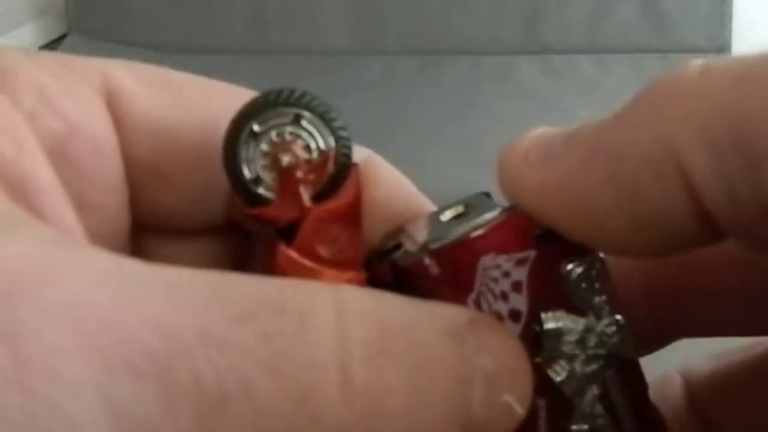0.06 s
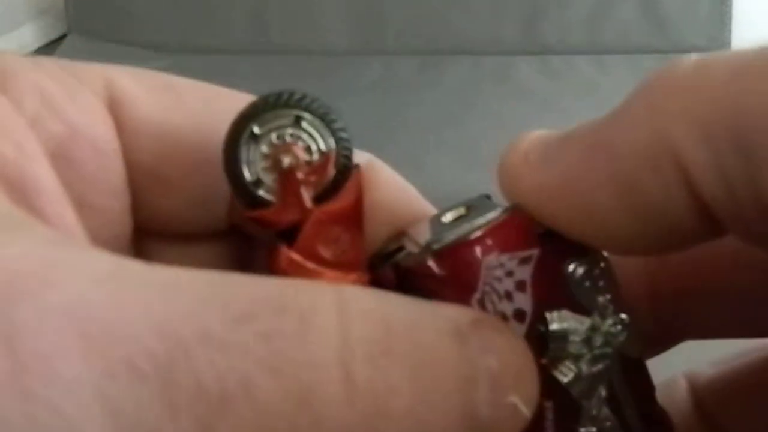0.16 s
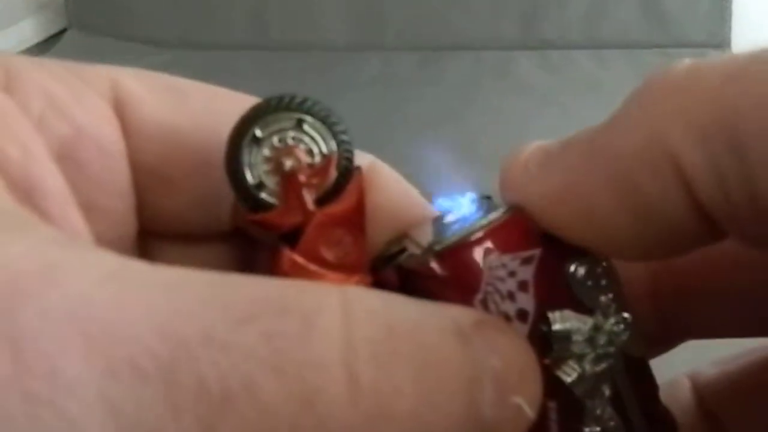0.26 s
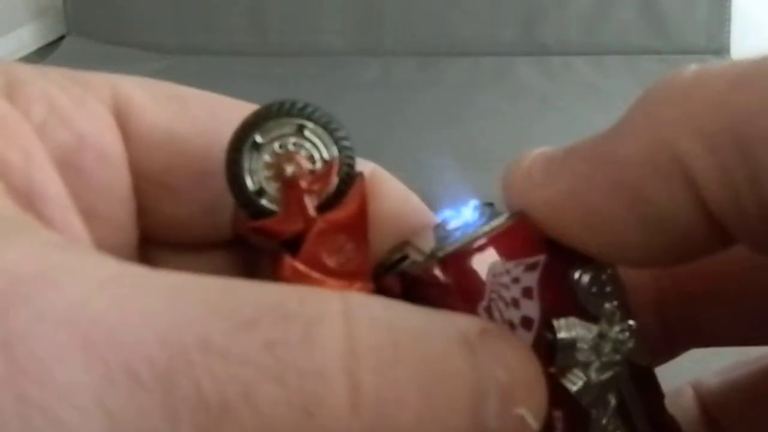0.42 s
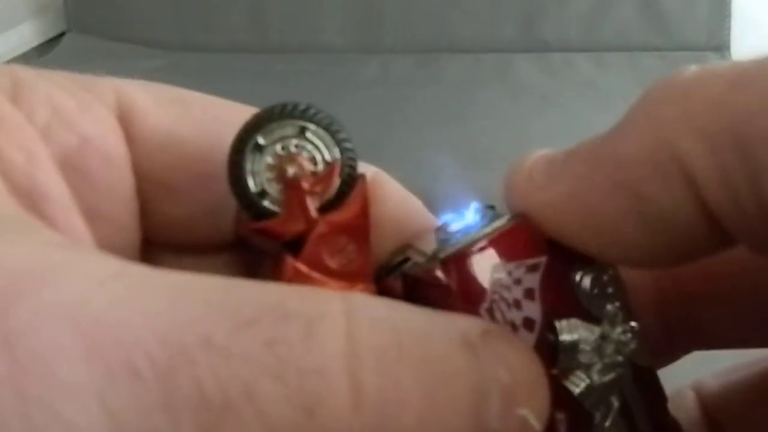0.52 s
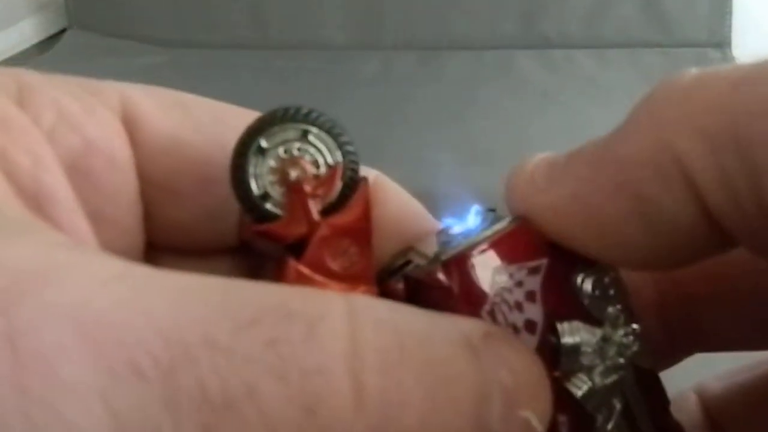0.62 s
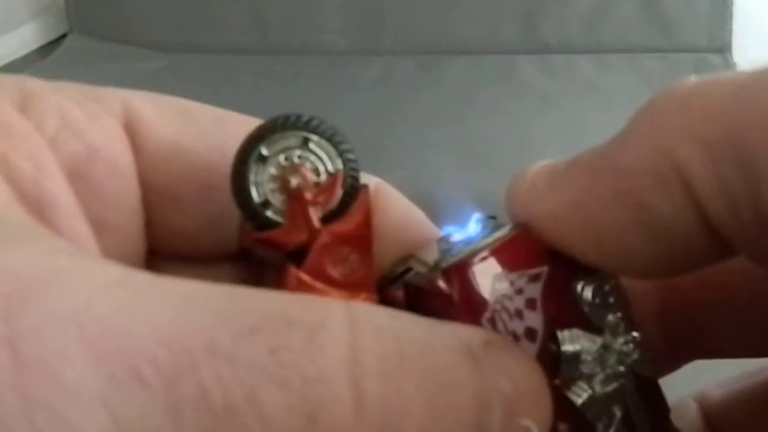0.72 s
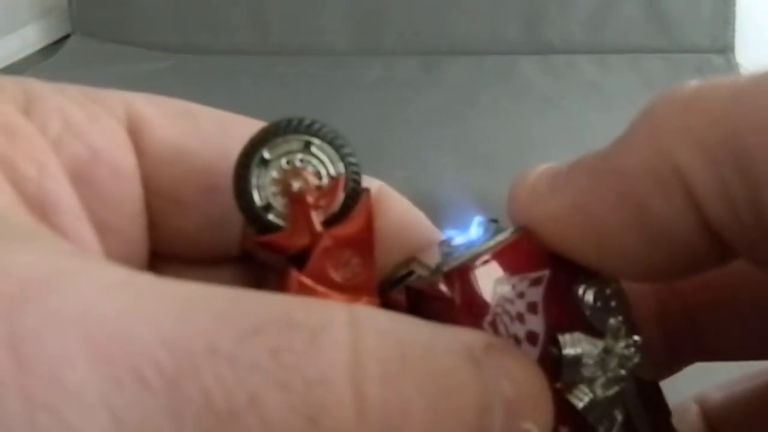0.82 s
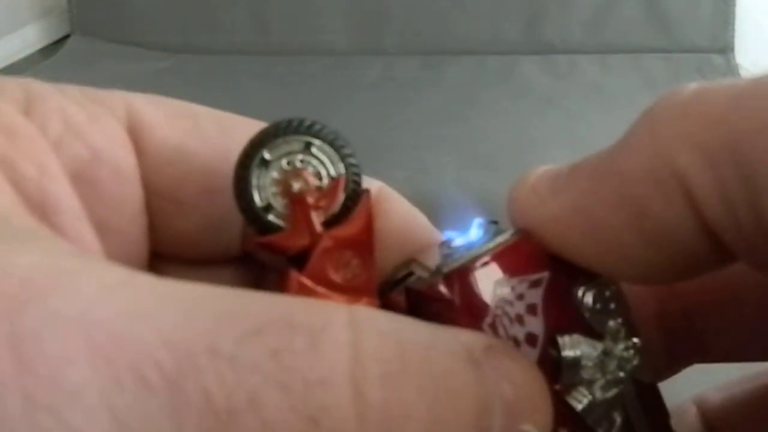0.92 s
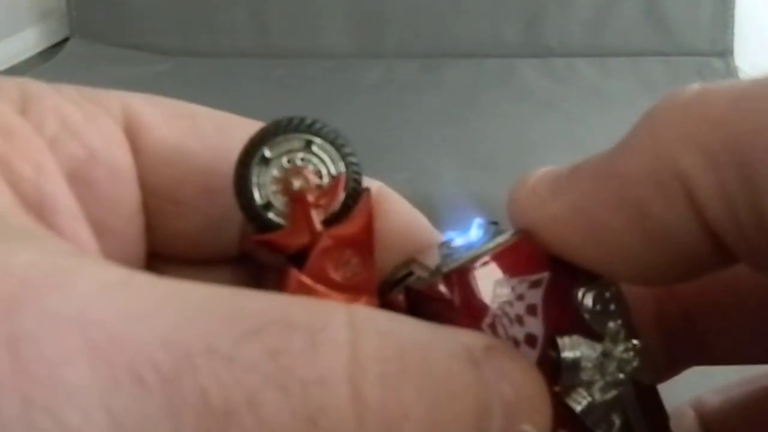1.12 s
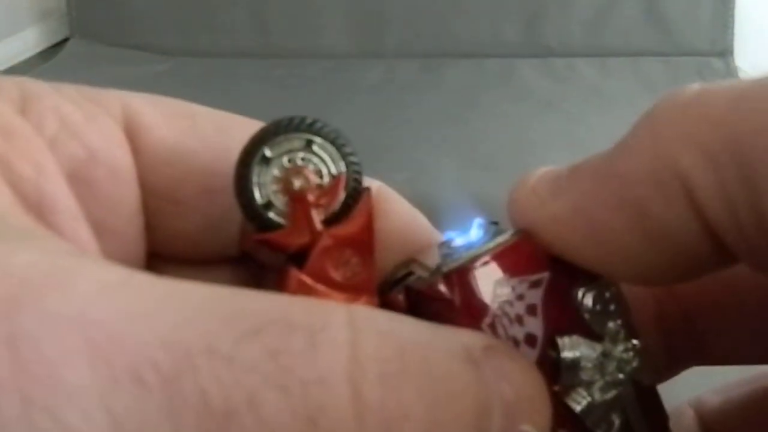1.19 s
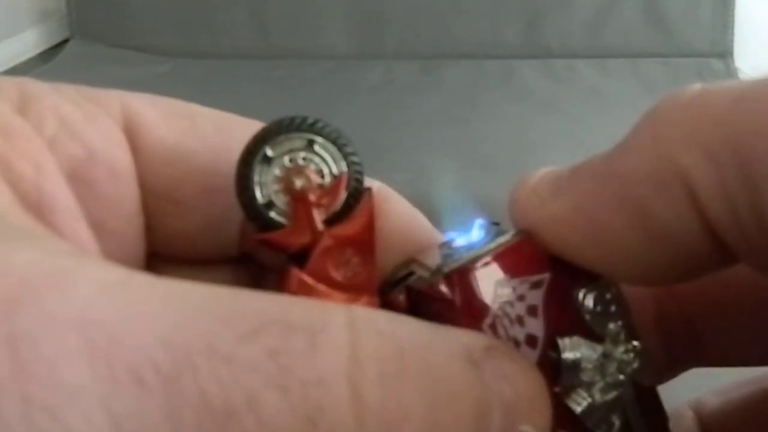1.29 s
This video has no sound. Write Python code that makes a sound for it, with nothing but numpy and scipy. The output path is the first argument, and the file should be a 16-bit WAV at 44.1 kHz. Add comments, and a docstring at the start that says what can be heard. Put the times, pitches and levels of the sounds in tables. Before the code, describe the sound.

A torch lighter hisses gas briefly, then ignites with one sharp metallic click. Its jet flame burns with a soft, steady roar, giving two tiny ticks and a short spit. Heard close up in a small, quiet room.

```python
"""Torch lighter in a quiet room

Gas hisses from the nozzle, close up, until the igniter's sprung hammer snaps and rings the body.
The jet flame burns with a soft roar, ticks twice as the nozzle warms and spits once as it settles.
The snap ducks an automatic gain control, which creeps back up over the next second."""
import sys
import numpy as np
from scipy import signal
from scipy.fft import rfft, irfft, next_fast_len
from scipy.io import wavfile

SR = 44100
rng = np.random.default_rng(int(sys.argv[2]) if len(sys.argv) > 2 else 0)


def wrap_up_sound(samples):
    """Save the sound to the file named by the first command line argument, as 16-bit audio."""
    columns = np.atleast_2d(samples).T
    # keep every value between -1 and 1, then stretch to whole-number steps
    tamed = np.clip(columns, -1, 1)
    steps = np.round(tamed * 32767).astype(np.int16)
    wavfile.write(sys.argv[1], SR, steps)


N = 59535

# Hiss of unlit gas. Each row: frequency in Hz, relative level in dB.
GAS_SPECTRUM = [(18, -47), (30, -19.5), (81, -2.5), (194, -3.5), (227, -1.5), (311, -2), (355, -10.5),
                (461, -9.5), (666, -13.5), (1460, -11), (2680, -20.5), (5040, -26.5), (6050, -25),
                (7470, -30), (8980, -22.5), (14000, -33.5), (16000, -43)]
# Brief, soft hiss around the snap. Each row: frequency in Hz, relative level in dB.
SWELL_SPECTRUM = [(200, 2), (1000, -0.5), (1900, -4), (3500, 0.5), (5500, -11.5), (8700, -2.5),
                  (11000, -5.5), (15500, -12.5)]
# The hammer's blow and rebound. Each row: start in seconds, level in dB.
HAMMER_BLOWS = [(.2503, 0.5), (0.2528, -18)]
# Ring of the lighter's body. Each row: pitch in Hz, relative level in dB, 60 dB decay in seconds.
BODY_MODES = [(1944, -9, .007), (2152, 2, 0.0073), (2407, -3, 0.0072), (2977, -2, 0.0082),
              (3546, -8.5, 0.0078), (3930, -16.5, 0.0051), (4600, -25, 0.014), (5410, -24.5, .007),
              (6940, -24.5, 0.01), (8330, -13.5, .006), (8927, -14.5, 0.0083), (10120, -24, 0.024),
              (11675, -21, 0.013), (13220, -16, 0.0052)]
# Bright edge of the crack and the ticks. Each row: frequency in Hz, relative level in dB.
CLICK_SPECTRUM = [(2000, -22), (5000, -4.5), (11000, 0.5), (16000, 0)]
# Thump of the jolt in the hand. Each row: pitch in Hz, level in dB, 60 dB decay in seconds.
THUMP_MODES = [(84.5, -34, .06), (130, -42, .35), (196.5, -31.5, 0.043), (258, -33, 0.032)]
# Spring rattle. Each row: frequency in Hz, relative level in dB.
RATTLE_SPECTRUM = [(300, -13.5), (1400, -15.5), (1900, 1), (3100, 2), (4200, -6), (5500, -10), (9000, -7),
                   (12000, -11.5), (15500, -16.5)]
# The flame's low roar. Each row: frequency in Hz, relative level in dB.
ROAR_SPECTRUM = [(25, -44), (60, -6.5), (130, -5.5), (200, -2), (275, -3), (360, -9.5), (490, -5),
                 (700, -15), (950, -14), (1650, -14.5), (2300, -21), (3650, -25), (4300, -36), (8000, -49),
                 (16000, -78)]
# The fizz on top of it. Each row: frequency in Hz, relative level in dB.
FIZZ_SPECTRUM = [(1500, -22), (4000, -0.5), (6000, 1), (7500, -3), (10000, -2), (15500, -8.5)]
# The flame's balance as it settles. Each row: time in seconds, roar level in dB, fizz level in dB.
FLAME_LEVELS = [(.26, -40.5, -71), (.45, -42.5, -71), (.6, -43.5, -66.5), (.8, -44, -65.5),
                (1.0, -43.5, -60), (1.12, -42.5, -58), (1.22, -43, -59), (1.35, -40, -57)]
# Ticks of the warming nozzle. Each row: start in seconds, level in dB.
NOZZLE_TICKS = [(0.9695, -32), (1.134, -44)]
# The spit's spurt of gas. Each row: frequency in Hz, relative level in dB.
SPIT_SPECTRUM = [(300, -18), (1000, 3), (2000, -6), (3000, -14), (4000, -3), (5000, -13), (9500, -9),
                 (15500, -21)]
# The spit's ring. Each row: centre in Hz, half-width in Hz, relative level in dB.
SPIT_RESONANCES = [(2334, 90, -1), (4000, 110, -6), (5880, 370, -1), (8500, 340, -18)]
# Length of the room's tail. Each row: frequency in Hz, 60 dB decay in seconds.
ROOM_DECAY = [(200, 0.19), (2500, 0.29), (9000, .2), (15000, .12)]
# Colour of that tail. Each row: frequency in Hz, relative level in dB.
ROOM_SPECTRUM = [(200, -2), (1500, -1.5), (2100, -6), (3000, -0.5), (6000, -3), (9000, 0), (15000, -4)]
# Stereo image of the noise, wider in the treble. Each row: frequency in Hz, left-right correlation.
STEREO_LIKENESS = [(60, 0.767), (200, 0.94), (500, .85), (1500, .88), (4000, 0.48), (12000, 0.32)]

IGNITE_S, CATCH_S = 0.2505, 0.043  # the snap, and the time constant of the gas-to-flame crossfade
TIME = np.arange(N) / SR


def amp(db):
    """Decibels to gain."""
    return 10 ** (np.asarray(db) / 20)


def along(points, hz):
    """Read a curve of (Hz, value) points on a log frequency axis."""
    freqs, values = np.transpose(points)
    return np.interp(np.log(hz + 1), np.log(freqs + 1), values)


def since(start_s):
    """Seconds elapsed after the start, zero before."""
    return np.maximum(TIME - start_s, 0)


def filtered(x, response):
    """Shape x with a gain that depends on frequency."""
    size = next_fast_len(N + SR // 2)
    hz = np.fft.rfftfreq(size, 1 / SR)
    return irfft(rfft(x, size) * response(hz), size)[..., :N]


def noise(response):
    """Coloured stereo noise of rms 1, narrow in the lows and wider on top."""
    def mid_side_gains(hz):
        angle = np.arccos(along(STEREO_LIKENESS, hz)) / 2
        return response(hz) * np.array([np.cos(angle), np.sin(angle)])

    mid, side = filtered(rng.standard_normal((2, N)), mid_side_gains)
    stereo = np.array([mid + side, mid - side])
    return stereo / np.sqrt(np.mean(stereo ** 2) + 1e-20)


def rush(spectrum):
    """Noise with a broad spectrum."""
    return noise(lambda hz: amp(along(spectrum, hz)))


def resonant(peaks):
    """Turbulence in resonances, each given as centre in Hz, half-width in Hz, relative dB."""
    return noise(lambda hz: sum(amp(db) / (1 + ((hz - mid) / width) ** 2) for mid, width, db in peaks))


def burst(spectrum, start_s, db, t60):
    """Noise that starts at once and falls 60 dB in t60 seconds."""
    t = since(start_s)
    return (t > 0) * amp(db - 60 * t / t60) * rush(spectrum)


def ringing(t, hz, db, t60, attack_s):
    """One damped mode, t seconds after a blow."""
    return amp(db - 60 * t / t60) * np.sin(2 * np.pi * hz * t) * (1 - np.exp(-t / attack_s))


def gas():
    """Unlit gas hisses and whistles until it catches. A brief, soft hiss swells and fades around the snap."""
    hiss = amp(-41.5) * rush(GAS_SPECTRUM)
    whistle = amp(-56.5) * resonant([(8850, 450, 0)])
    swell_db = -31.5 - 12 * ((TIME - IGNITE_S) / 0.024) ** 2  # 12 dB down 24 ms to either side
    swell = amp(swell_db) * rush(SWELL_SPECTRUM)
    return (hiss + whistle) * np.exp(-since(IGNITE_S) / CATCH_S) + swell


def igniter():
    """The sprung hammer cracks, rings the body (too small to radiate bass) and jolts the hand."""
    snap = np.zeros((2, N))
    bass_cut = signal.butter(6, 1680, "high", fs=SR, output="sos")
    for start_s, blow_db in HAMMER_BLOWS:
        t = since(start_s)
        ring = sum(ringing(t, hz, db, t60, attack_s=0.97 / hz) for hz, db, t60 in BODY_MODES)
        crack = burst(CLICK_SPECTRUM, start_s, db=-20, t60=0.006)
        snap += amp(blow_db) * (signal.sosfilt(bass_cut, ring) + crack)
    thump = sum(ringing(since(IGNITE_S), *mode, attack_s=0.0018) for mode in THUMP_MODES)
    return snap + thump


def spring_rattle():
    """The released spring shivers densely and dies away."""
    return burst(RATTLE_SPECTRUM, IGNITE_S, db=-28.5, t60=0.17)


def flame():
    """The lit jet roars with a hollow low resonance; its fizz grows as it settles."""
    times, roar_db, fizz_db = np.transpose(FLAME_LEVELS)
    broad = rush(ROAR_SPECTRUM)
    hollow = amp(-7.5) * resonant([(242, 70, 0)])
    roar = amp(np.interp(TIME, times, roar_db)) * (broad + hollow)
    fizz = amp(np.interp(TIME, times, fizz_db)) * rush(FIZZ_SPECTRUM)
    fade_in = 1 - np.exp(-since(IGNITE_S) / CATCH_S)
    return (roar + fizz) * fade_in


def nozzle_ticks():
    """Tiny crisp ticks from the warming nozzle."""
    return sum(burst(CLICK_SPECTRUM, start_s, db, t60=0.0089) for start_s, db in NOZZLE_TICKS)


def spit(start_s=1.021, attack_s=0.016, hold_s=0.029, spurt_t60=0.19, ring_t60=0.35):
    """A short bright spurt of gas with narrow resonances that linger."""
    rise = np.minimum(since(start_s) / attack_s, 1)
    fading_s = since(start_s + hold_s)
    spurt = amp(-41 - 60 * fading_s / spurt_t60) * rush(SPIT_SPECTRUM)
    ring = amp(-46 - 60 * fading_s / ring_t60) * resonant(SPIT_RESONANCES)
    return rise * (spurt + ring)


def room(x):
    """A small room's short tail, each frequency dying at its own speed."""
    wash = rush(ROOM_SPECTRUM)[:, :SR // 2]
    hz, t, bands = signal.stft(wash, SR, nperseg=256)
    decay = amp(-60 * t / along(ROOM_DECAY, hz)[:, None])
    _, tail = signal.istft(bands * decay, SR, nperseg=256)
    return signal.fftconvolve(x, tail / np.linalg.norm(tail[0]), axes=1)[:, :N]


def scene():
    """The lighter sits slightly to the right, with room on the clicks only."""
    clicks = igniter() + spring_rattle() + nozzle_ticks()
    mix = clicks + amp(-12) * room(clicks) + gas() + flame() + spit()
    return mix * amp([[-0.75], [0.75]])


def record(dry, threshold_db=-16.5, attack_s=0.03, release_db_per_s=14.5, low_hz=48, top_hz=15900):
    """Gain control ducks after a peak and recovers slowly; then the lows and the very top are cut."""
    peak_db = 20 * np.log10(np.abs(dry).max(axis=0) + 1e-9)
    over_db = np.maximum(peak_db - threshold_db, 0)
    recovery_db = release_db_per_s * TIME
    held_db = np.maximum.accumulate(over_db + recovery_db) - recovery_db
    pole = np.exp(-1 / (attack_s * SR))
    duck_db = signal.lfilter([1 - pole], [1, -pole], held_db)
    ducked = dry * amp(-duck_db)
    low_cut = signal.butter(4, low_hz, "high", fs=SR, output="sos")
    return filtered(signal.sosfilt(low_cut, ducked), lambda hz: hz < top_hz)


dry = scene()
out = record(dry)
wrap_up_sound(out)
```